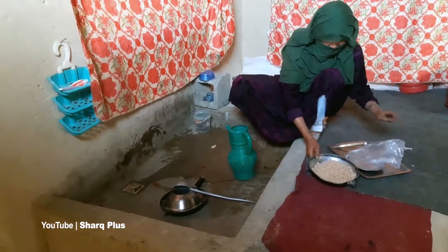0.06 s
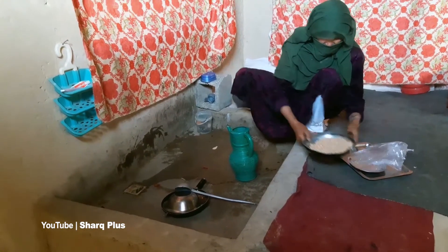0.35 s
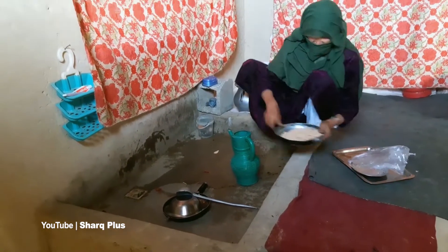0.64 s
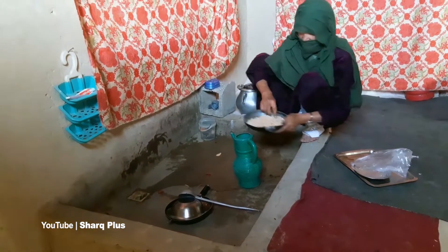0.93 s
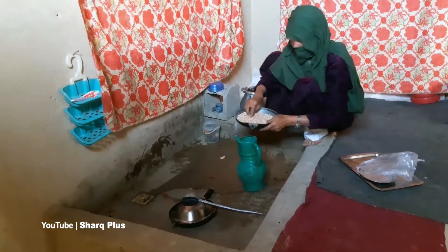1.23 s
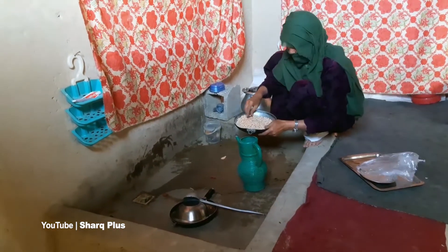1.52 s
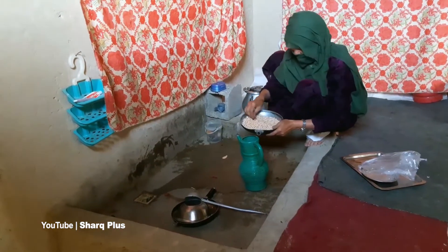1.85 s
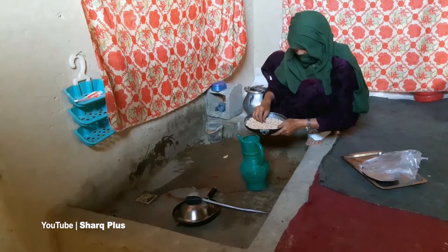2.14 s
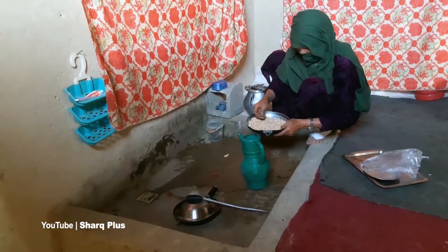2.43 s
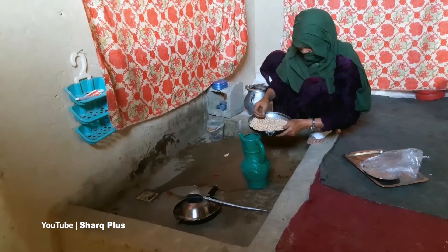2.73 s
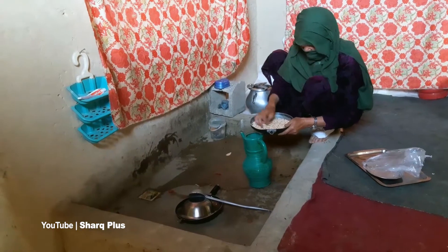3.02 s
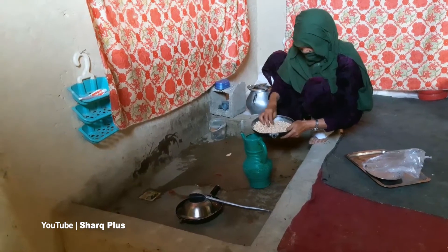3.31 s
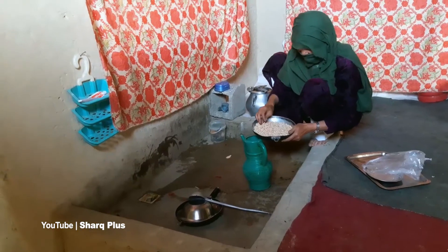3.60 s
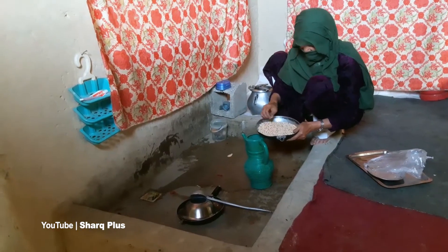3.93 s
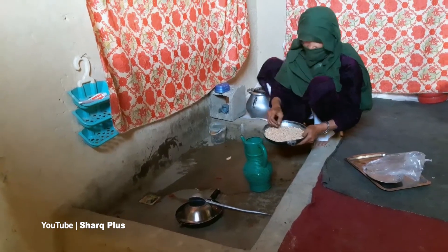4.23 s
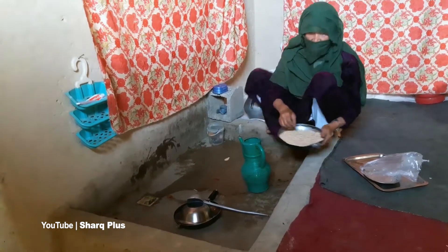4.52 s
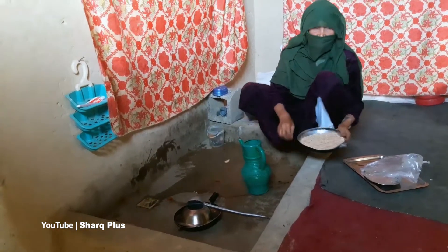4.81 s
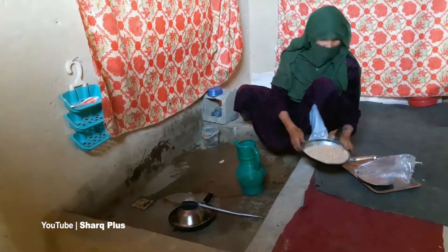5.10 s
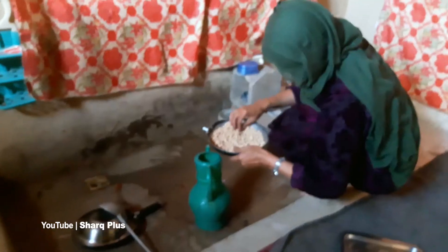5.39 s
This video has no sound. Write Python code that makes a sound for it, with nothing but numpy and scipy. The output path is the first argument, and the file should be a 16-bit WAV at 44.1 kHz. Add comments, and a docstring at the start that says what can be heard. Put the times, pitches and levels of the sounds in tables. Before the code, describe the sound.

In a small bare kitchen, dried chickpeas shift softly on a metal plate while clothes rustle. Fingers then rake the heap and let handfuls trickle back in several short rattling bursts, with a light metallic ring and sharp ticks from stray peas. The sound comes from across the room with a short echo. After a lull, a last handful is suddenly heard close by, over a faint hum.

```python
"""Sorting chickpeas on a metal plate

In a small bare kitchen, a plate of dried chickpeas is lifted and the heap slides. Fingers rake it and
let handfuls trickle back: thousands of tiny knocks make the plate ring, and stray peas tick on the
metal. The last handful is suddenly heard from close by. Clothes rustle over a faint hum."""
import sys
import numpy as np
from scipy import signal
from scipy.fft import rfft, irfft
from scipy.io import wavfile

SR = 44100
rng = np.random.default_rng(int(sys.argv[2]) if len(sys.argv) > 2 else 0)


def store_wav(level_fs):
    """Save 16-bit WAV to argv[1]."""
    pcm = np.round(np.clip(np.atleast_2d(level_fs), -1, 1) * 32767)
    wavfile.write(sys.argv[1], SR, pcm.T.astype(np.int16))


N = 244755
TIME = np.arange(N) / SR
CLOSE_FROM_S = 5.179

# Each stir or tilt that sets peas running (treble and low ring are relative to the level):
# start_s, level_db, swell_s, hold_s, settle_db_per_s, treble_db, low_ring_db
STIRS = [(-0.05, -54, .04, .01, 72, -9, 4), (0.36, -62, .13, 0, 90, -5, 3),
         (0.58, -56, .03, .04, 135, -17, 3), (0.81, -66, .04, .03, 130, -5, 8),
         (0.944, -22.5, .115, .07, 50, -18.5, -13), (1.28, -39.5, .08, .07, 56, -20, -1),
         (2.101, -36.5, .045, 0, 116, -25, 6), (2.34, -62, .06, 0, 120, -24, 3),
         (2.985, -26.8, .12, .17, 86, -21.5, -4), (3.545, -54.5, .035, .01, 200, -26, 7)]
# The handful close by: start_s, level_db, swell_s, hold_s, settle_db_per_s
HANDFUL = (5.095, -20.5, .17, .055, 90)


def stirring(gain_db=-1.2, treble_lift_db=1.5):
    """Peas slide and trickle onto the heap; pressed down, they wake the plate's low notes."""
    heap_tone = [(100, -25), (200, -20), (400, -19), (510, -11), (680, -7), (800, -3), (1100, -4.5),
                 (1500, -2.5), (2400, 1.5), (3800, -1), (5400, 1), (6500, -1.5), (8200, -17.5),
                 (12500, -13.5), (16000, -31)]  # the rattle across the room: pitch_hz, level_db
    low_notes = [(565.3, 61, -1), (768, 69, 2), (866, 50, -3)]  # the plate's low notes: pitch_hz, width_hz, level_db
    flows = np.array([flow(*row[:5]) for row in STIRS])
    strongest = flows.argmax(axis=0)  # this stir sets the tone
    treble_db, low_ring_db = np.array(STIRS)[strongest, 5:].T
    knocks = collisions(flows.sum(axis=0), per_s=7000, spread_db=4.0, fewest_per_s=450)
    rattle = through(knocks, plate(heap_tone, close=False))
    low_ring = sum(from_db(db) * resonance(rattle, hz, width) for hz, width, db in low_notes)
    rattle = rattle + from_db(low_ring_db) * low_ring
    return from_db(gain_db) * harden(rattle, treble_db + treble_lift_db)


def flow(start_s, db, swell_s, hold_s, settle_db_per_s, settle_db_per_s2=110):
    """Loudness of running peas: more join in, they keep running, then settle ever faster."""
    swell = np.sin(np.pi / 2 * np.clip((TIME - start_s) / swell_s, 0, 1)) ** 2
    settling_s = np.maximum(TIME - start_s - swell_s - hold_s, 0)
    return swell * from_db(db - settle_db_per_s * settling_s - settle_db_per_s2 * settling_s ** 2)


def collisions(gain, per_s=5200, crowding=.8, spread_db=3.5, fewest_per_s=260, click_s=.00025, kinds=20):
    """Peas of many kinds knock at random; a louder flow has more knocks each second."""
    knocks_per_s = fewest_per_s + per_s * (gain / from_db(-27.5)) ** crowding
    chance = np.clip(knocks_per_s / SR, 0, 1)
    sizes = from_db(spread_db * np.clip(rng.standard_normal(N), -2, 2))
    knocks = (rng.random(N) < chance) * sizes * gain / np.sqrt(chance * np.mean(sizes ** 2))
    kind = rng.integers(0, kinds, N)
    age = TIME[:SR // 200]
    clicks = rng.standard_normal((kinds, len(age))) * np.exp(-age / click_s)
    return sum(through(knocks * (kind == k), unit(click)) for k, click in enumerate(clicks))


def plate(heap_tone, close):
    """The answer to one knock: the plate's notes, damped by the peas, stand out of the heap's tone."""
    notes = [(762, 46, -6, -8.5), (892, 42, -7.5, -4.5), (1170, 60, -8.5, -5), (1197, 30, -10, -5),
             (1380, 30, -9.5, -17), (1490, 45, -8.5, -2), (1830, 56, -10, -11), (2130, 80, -8.5, -6),
             (2546, 58, -11.5, -10), (2620, 60, -11, -3), (2835, 91, -5, -9), (4530, 110, -18.5, -7),
             (5280, 250, -14.5, -19)]  # the loaded plate's notes: pitch_hz, width_hz, far_db, close_db
    heap = colour(heap_tone)
    ring = sum(from_db(near if close else far) * resonance(heap, hz, width)
               for hz, width, far, near in notes)
    return unit(heap + ring)


def clumps(gain_db=0.5, landing_s=.003, ring_db=-1.5, width_hz=1400):
    """A clump of peas lands almost at once and settles in a short shower of knocks."""
    landings = [(0.481, -43, -26, .013), (0.489, -29.5, -14, .019), (0.823, -60, -6, .025),
                (0.964, -30.5, -22, .05), (1.198, -26, -1, .045), (1.244, -24, -22, .02),
                (1.333, -31, -13, .02), (1.402, -28, -2, .028), (1.447, -29.5, -17, .012),
                (1.512, -30, -12, .018), (1.527, -33, -25, .016), (1.608, -38, -19, .022),
                (2.285, -52, -29, .025), (2.424, -46.5, -14, .026), (3.481, -42, -20, .018),
                (5.03, -56, -3.5, .02)]  # each clump: start_s, level_db, treble_db, fade_s
    ring_pitches = [(-28, 2600), (-14, 5600)]  # harder landings ring higher: treble_db, pitch_hz
    landing = colour([(200, -26), (550, -11), (800, -1.5), (1500, -3.5), (2800, -2), (5600, 1.5),
                      (6600, 0.5), (8000, -17), (12500, -14), (16000, -23.5)])
    rattle = through(collisions(from_db(-27.5) * np.ones(N)), landing)
    out, age = np.zeros(N), TIME[:SR // 5]
    for start_s, db, treble_db, fade_s in landings:
        at = round(start_s * SR)
        span = slice(at, at + len(age))
        ring_hz = np.interp(treble_db, *np.transpose(ring_pitches))
        shower = rattle[span] + from_db(ring_db) * resonance(rattle[span], ring_hz, width_hz)
        envelope = from_db(db + gain_db) * (1 - np.exp(-age / landing_s)) * np.exp(-age / fade_s)
        out[span] += harden(shower / np.std(shower), treble_db) * envelope
    return out


def ticks(gain_db=1.5, fade_s=0.0019, ring_db=9):
    """Single peas strike bare metal: each is a dry crack with a rough pitch of its own."""
    strikes = [(0.084, -39, 4900, -11), (0.464, -47, 5270, -14), (0.6, -38.5, 6400, 2),
               (1.334, -14, 5450, -6), (1.41, -17, 5460, -4), (1.496, -24, 5550, -12),
               (1.596, -26, 6500, -11), (1.673, -27, 4600, -29), (1.753, -39, 5050, -26),
               (1.919, -40, 3100, -19), (1.927, -40, 2900, -23), (2.4245, -38, 4500, -20),
               (2.4457, -30, 4470, -28), (2.63, -53, 5200, -21), (3.219, -14, 4680, -16),
               (3.482, -23.5, 5030, -19), (3.7906, -45, 4900, -27), (5.03, -45, 5240, -3),
               (5.104, -53, 3400, -16), (5.3802, -11, 5000, -11), (5.525, -26, 5700, -25)]  # each pea: start_s, level_db, pitch_hz, treble_db
    crack = colour([(300, -37), (1400, -19), (2800, -5), (6200, -4.5), (8000, -20), (12500, -8),
                    (16000, -28)])
    out, age = np.zeros(N + SR), TIME[:SR // 30]
    for start_s, db, hz, treble_db in strikes + strays():
        burst = unit(rng.standard_normal(len(age)) * np.exp(-age / fade_s))
        burst[0] += .6  # the first contact stands out
        tick = through(burst, crack)[:len(age)]
        tick = harden(tick + from_db(ring_db) * resonance(tick, hz, width=hz / 2), treble_db)
        at = round(start_s * SR)
        out[at:at + len(age)] += from_db(db + gain_db) * tick / np.abs(tick).max()
    return out[:N]


def strays(per_s=9, over_flow_db=6, spread_db=2.5, pitch_hz=4900, spread_octaves=.25, treble_db=-15):
    """List peas that jump out at random: the livelier the heap, the harder they strike."""
    gain = flow(*HANDFUL) * (TIME >= CLOSE_FROM_S) + sum(flow(*row[:5]) for row in STIRS)
    at = np.flatnonzero(rng.random(N) < per_s / SR)
    size, detune = np.clip(rng.standard_normal((N, 2))[at], -2, 2).T
    levels_db = 20 * np.log10(gain[at] + 1e-9) + over_flow_db + spread_db * size
    pitches_hz = pitch_hz * 2 ** (spread_octaves * detune)
    return [(start_s, db, hz, treble_db) for start_s, db, hz in zip(TIME[at], levels_db, pitches_hz)]


def close_pour(treble_db=-14, thump_db=-44, thump_s=.001):
    """A handful already falling, close by; it cuts in with a soft thump."""
    heap_tone = [(100, -50), (250, -26.5), (560, -19), (720, -8.5), (900, -2.5), (1200, -1), (1700, -3),
                 (2300, -2.5), (3700, -5.5), (5000, -2), (6100, -1), (8200, -21.5), (10300, -14),
                 (16000, -25)]  # the rattle close by: pitch_hz, level_db
    knocks = collisions(flow(*HANDFUL), per_s=6500, spread_db=3.0)
    rattle = through(knocks, plate(heap_tone, close=True))
    rattle = kitchen(harden(rattle, treble_db), echo_db=-10.0)
    thump = from_db(thump_db) * np.exp(-np.abs(TIME - CLOSE_FROM_S) / thump_s)
    return (rattle + thump) * (TIME >= CLOSE_FROM_S)


def kitchen(x, echo_db, first_echo_s=0.002, bands=12):
    """The bare room adds an echo that dies sooner in the treble; overall power stays the same."""
    echo_times = [(200, 0.58), (700, 0.47), (1500, .3), (3500, .27), (7000, 0.12), (14000, 0.2)]  # time the echo takes to fall 60 dB: pitch_hz, fade_s
    age, tail = TIME[:SR // 2], 0
    white = rfft(rng.standard_normal(len(age)))
    hz = np.fft.rfftfreq(len(age), 1 / SR)
    centres = np.geomspace(150, 16000, bands)
    for centre, share in zip(centres, np.eye(bands)):
        band = irfft(white * np.interp(hz, centres, share), len(age))
        tail = tail + band * from_db(-60 * age / at_hz(echo_times, centre))
    echo = through(x, unit(tail * (age > first_echo_s)))
    echo_gain = from_db(echo_db)
    return (x + echo_gain * echo) / np.sqrt(1 + echo_gain ** 2)


def clothes(resting_swish_db=-81, resting_brush_db=-76):
    """Cloth swishes and brushes with each move of the body, and faintly in between."""
    moves = [(0.03, .16, -63, -61), (0.46, .09, -61.5, -66), (0.88, .25, -67, -69), (4.5, .28, -72, -83),
             (4.77, .028, -61.5, -69), (5.42, .3, -65, -67)]  # each move: middle_s, half_length_s, swish_db, brush_db
    swish_tone = [(1000, -13.5), (3500, -11.5), (5000, -0.5), (6500, -2), (8000, -24.5), (12000, -11),
                  (16000, -10)]  # high swish of cloth: pitch_hz, level_db
    brush_tone = [(40, -13.5), (100, -3.5), (150, -0.5), (300, -10), (800, -8), (1300, -22), (4000, -42.5)]  # low brushing of cloth: pitch_hz, level_db
    swish, brush = from_db(resting_swish_db), from_db(resting_brush_db)
    for middle_s, half_s, swish_db, brush_db in moves:
        swell = np.exp(-((TIME - middle_s) / half_s) ** 2)
        swish = np.hypot(swish, from_db(swish_db) * swell)
        brush = np.hypot(brush, from_db(brush_db) * swell)
    return swish * noise(swish_tone) + brush * noise(brush_tone)


def background(air_db=-69.6, hum_hz=57, hum_db=-77, drone_hz=810, drone_db=-79):
    """Still air with a low hum and a faint hollow drone."""
    air_tone = [(18, -38), (30, -12), (59, -11.5), (161, -8), (295, -6), (394, -10.5), (569, -10),
                (632, -23), (822, -13), (988, -20), (2290, -18), (2680, -22), (5740, -31), (8300, -27.5),
                (16000, -16.5)]  # the quiet room: pitch_hz, level_db
    hum = resonance(rng.standard_normal(N), hum_hz, width=9.9)
    drone = resonance(rng.standard_normal(N), drone_hz, width=90)
    air = from_db(air_db) * noise(air_tone)
    return air + from_db(hum_db) * hum / np.std(hum) + from_db(drone_db) * drone / np.std(drone)


def harden(x, treble_db, edge_hz=7600):
    """Harder knocks are brighter: set the level above edge_hz relative to the level below it."""
    low = signal.sosfilt(signal.butter(7, edge_hz, "low", fs=SR, output="sos"), x)
    high = signal.sosfilt(signal.butter(7, edge_hz, "high", fs=SR, output="sos"), x)
    return low + from_db(treble_db) * unit(high) * np.linalg.norm(low)


def resonance(x, hz, width):
    """Let x ring at one pitch; a smaller width (in Hz) rings longer."""
    r = np.exp(-np.pi * width / SR)
    feedback = [1, -2 * r * np.cos(2 * np.pi * hz / SR), r * r]
    return signal.lfilter(np.array([1, 0, -1]) * (1 - r * r) / 2, feedback, x)


def colour(tone, size=8192):
    """A click whose tone follows rows of pitch_hz, level_db."""
    gains = from_db(at_hz(tone, np.fft.rfftfreq(size, 1 / SR)))
    cepstrum = irfft(np.log(gains))
    # Folding onto the first half packs the energy at the click's start.
    cepstrum[1:size // 2] *= 2
    cepstrum[size // 2 + 1:] = 0
    return unit(irfft(np.exp(rfft(cepstrum))))


def noise(tone):
    """Steady noise with the given tone."""
    return through(rng.standard_normal(N), colour(tone))


def through(x, response):
    """Let every sample of x set off a copy of the response."""
    return signal.fftconvolve(x, response)[:N]


def at_hz(points, hz):
    """Read between a table's rows, with octaves evenly spaced."""
    pitches, values = np.transpose(points)
    return np.interp(np.log(np.maximum(hz, 1)), np.log(pitches), values)


def unit(x):
    """Scale a sound to energy 1."""
    return x / np.sqrt(np.sum(x ** 2) + 1e-20)


def from_db(db):
    """Turn decibels into a multiplier."""
    return 10 ** (np.asarray(db) / 20)


def scene():
    """The plate across the room, then close by."""
    across = kitchen(stirring() + clumps(), echo_db=-6.0) + kitchen(ticks(), echo_db=-1.0)
    return (across + close_pour() + clothes() + background())[None]


def record(dry, low_cut_hz=42, high_cut_hz=15900):
    """Trim the deepest bass gently and the highest treble steeply."""
    lean = signal.sosfilt(signal.butter(2, low_cut_hz, "high", fs=SR, output="sos"), dry)
    return signal.sosfilt(signal.ellip(10, .1, 70, high_cut_hz, fs=SR, output="sos"), lean)


dry = scene()
out = record(dry)
store_wav(out)
```